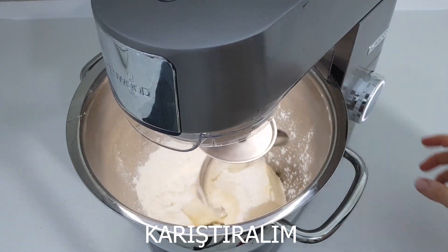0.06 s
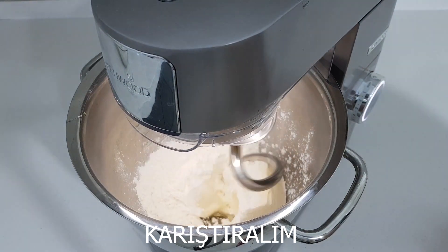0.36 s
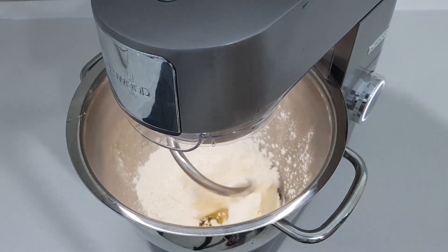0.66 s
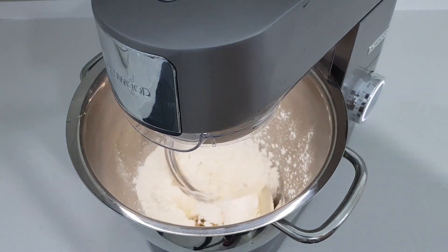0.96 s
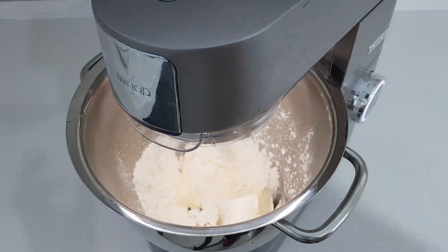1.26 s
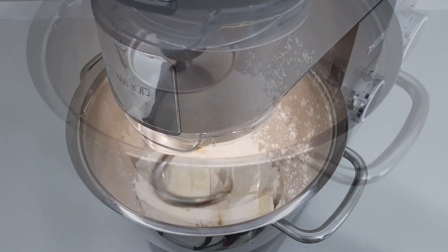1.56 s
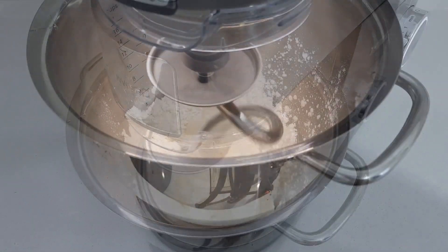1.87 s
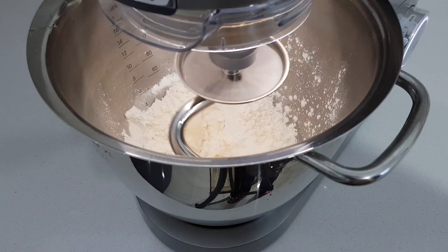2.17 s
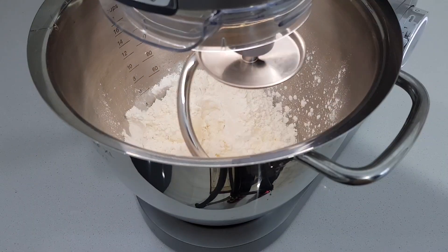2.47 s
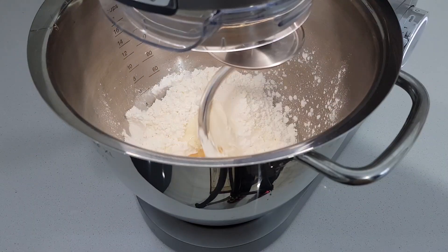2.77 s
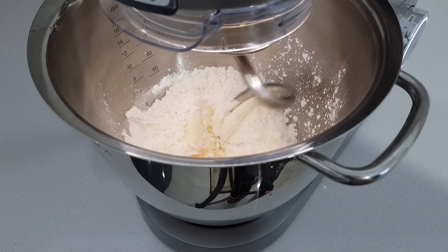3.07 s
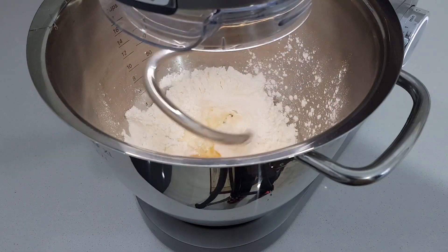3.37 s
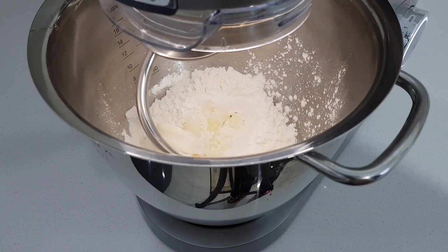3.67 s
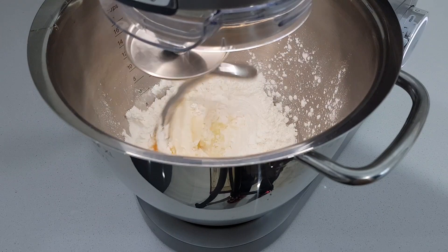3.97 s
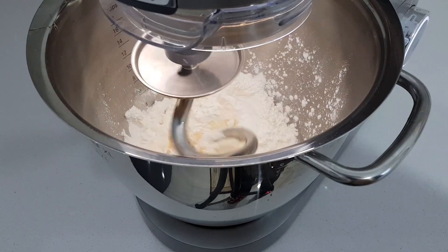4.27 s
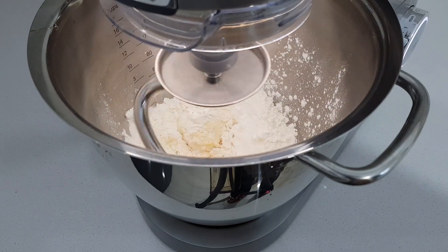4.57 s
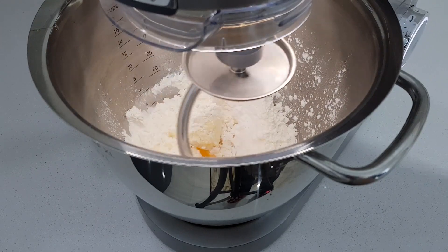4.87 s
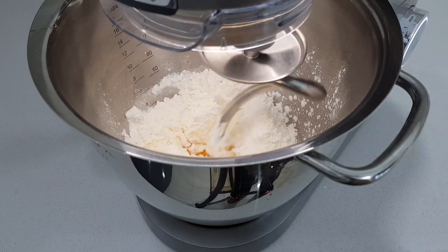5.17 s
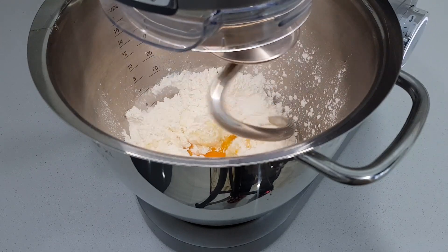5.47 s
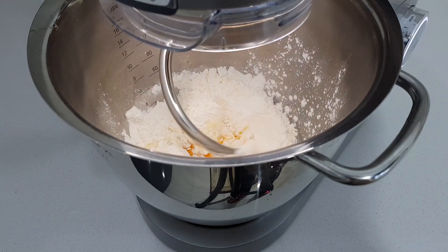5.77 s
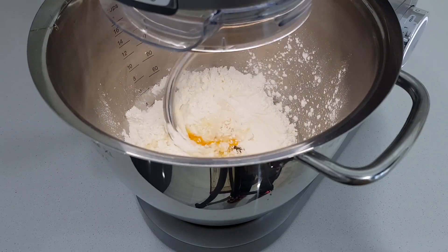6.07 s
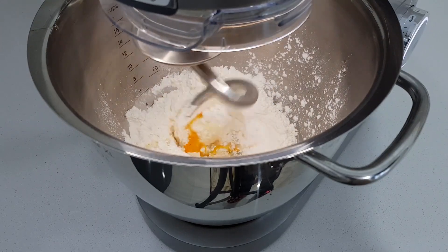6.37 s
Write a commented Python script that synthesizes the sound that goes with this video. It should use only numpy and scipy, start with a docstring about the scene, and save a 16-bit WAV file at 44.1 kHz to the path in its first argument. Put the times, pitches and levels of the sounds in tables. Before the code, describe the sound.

A stand mixer runs steadily close by, humming and whining with chattering gears as its hook turns flour in a steel bowl.

```python
"""Stand mixer working dough

In a kitchen, a stereo microphone close to a steel bowl in which a dough hook turns flour and butter.
The motor hums on the mains and whines with its load-dependent speed; its gears growl, chatter and
knock, ringing housing and bowl. The brushes sizzle, cooling air rushes, and now and then the hook
swishes through the flour. After a short silence the sound cuts in, already at speed."""
import sys
import numpy as np
from scipy import signal
from scipy.fft import rfft, irfft, next_fast_len
from scipy.io import wavfile
from scipy.ndimage import map_coordinates

SR = 44100
rng = np.random.default_rng(int(sys.argv[2]) if len(sys.argv) > 2 else 0)


def master(y):
    """Save y as 16-bit WAV."""
    cut = np.clip(np.atleast_2d(y).T, -1, 1)
    pcm = np.round(cut * 32767)  # scale
    wavfile.write(sys.argv[1], SR, pcm.astype(np.int16))


N = 291942
TIME = np.arange(N) / SR
MAINS_HZ = 50.02

# Low hum and higher housing buzz: mains multiple, level/dB, left minus right/dB
HUM_LINES = [(1, -31, 4), (2, -5, 3), (4, -16.5, 1.5)]
BUZZ_LINES = [(6, 0, 0), (7, -22.5, 3), (8, -27, -2), (9, -19.5, -12), (11, -29, 29), (12, -11, 11),
              (16, -26, -8)]
# Course of the hum, the buzz and the singing tenth mains multiple: t/s, level/dB
HUM_LEVEL = [(.72, -38.5), (1.3, -36), (1.58, -43), (1.9, -39.5), (2.08, -43.5), (2.35, -34.5), (2.9, -41),
             (3.55, -36), (3.74, -47.5), (4.3, -37), (4.45, -43.5), (4.7, -37.5), (5.1, -41), (5.55, -37.5),
             (5.95, -41.5), (6.62, -39.5)]
BUZZ_LEVEL = [(.72, -42.5), (.95, -43.5), (1.55, -44), (1.8, -47.5), (2.4, -44.5), (2.54, -40.5),
              (2.7, -46.5), (3.3, -45.5), (3.55, -45), (4.05, -45.5), (4.75, -50), (5.2, -45.5),
              (5.28, -51.5), (5.38, -45.5), (6.07, -45), (6.16, -53), (6.27, -42.5), (6.62, -48.5)]
SING_LEVEL = [(.72, -59), (1.55, -59), (1.85, -49), (2.28, -48.5), (2.6, -57), (3.05, -49), (3.3, -59),
              (3.92, -48.5), (4.04, -61), (4.45, -55), (4.78, -60), (4.9, -53), (5.25, -53), (5.37, -56),
              (5.53, -50), (5.7, -57), (5.85, -50), (6.03, -51), (6.2, -49)]
# Brief dips and swells of the hum: t/s, change/dB
HUM_SWINGS = [(.82, -8), (1.09, -22), (1.39, -4), (1.59, -5), (1.83, -3), (2.04, -22), (2.44, -4),
              (3.18, 1), (3.28, -19), (3.5, -18), (3.58, -1), (4.51, 6.5), (4.93, -12), (5.61, -9),
              (5.9, 6), (6.17, -7), (6.4, -19)]
# Rotor tones and gear-mesh whine: shaft multiple, level/dB, left minus right/dB
ROTOR_LINES = [(3, -16, 3), (4, -9.5, -6), (5, -16, 13), (12, -15, -9.5)]
WHINE_LINES = [(24, 0, 2), (30, -14, 0), (48, -11, 0)]
# Course of the whine: t/s, level/dB
WHINE_LEVEL = [(1.1, -58), (1.5, -63), (2, -58), (5.3, -58.5), (5.9, -54.5), (6.2, -58.5)]
def motor(turns):
    """The field hums and shakes the housing; the rotor whines, its imbalance beating with the hum."""
    mains = MAINS_HZ * TIME
    hum_db = curve(HUM_LEVEL) + swells(HUM_SWINGS, half_s=0.022)
    buzz_db = curve(BUZZ_LEVEL) - 9 * lean()
    hum = amp(hum_db) * lines(HUM_LINES, mains, flutter=.26, flutter_hz=16)
    buzz = amp(buzz_db) * lines(BUZZ_LINES, mains, flutter=.12, flutter_hz=18)
    sing = amp(curve(SING_LEVEL)) * lines([(10, -1, 5.7)], mains, flutter=.28, flutter_hz=25)
    rotor = amp(-49 + lean()) * lines(ROTOR_LINES, turns, flutter=.5, flutter_hz=24)
    whine = amp(curve(WHINE_LEVEL)) * lines(WHINE_LINES, turns, flutter=.45, flutter_hz=50)
    imbalance = lines([(1, -55, 2.7)], turns, flutter=0.41, flutter_hz=12)
    return hum + buzz + sing + rotor + imbalance + whine


# Motor speed, heard as the pitch of the gear mesh: t/s, f/Hz
MESH_PITCH = [(.7, 2449), (1, 2508), (1.2, 2470), (1.5, 2689), (1.72, 2744), (1.84, 2533), (2.15, 2509),
              (2.45, 2346), (2.9, 2560), (3.05, 2457), (3.25, 2542), (3.9, 2530), (4.05, 2463),
              (4.55, 2459), (4.82, 2398), (5.2, 2540), (5.8, 2500), (6.05, 2567), (6.17, 2403),
              (6.45, 2524)]
def shaft(teeth=24):
    """Turns of the rotor so far, with a slight speed flutter."""
    mesh_hz = curve(MESH_PITCH) * (1 + 0.00191 * wobble(25))
    return np.cumsum(mesh_hz) / teeth / SR


def lean(round_s=2.374, first_s=2.038, half_s=0.1):
    """0 to 1: the hook presses into the butter, once in each round of the bowl."""
    from_lean_s = (TIME - first_s + round_s / 2) % round_s - round_s / 2
    return np.exp(-(from_lean_s / half_s) ** 2)


def throb(turns, gear_ratio=12.61, tight_at_s=3.957, sharpness=0.4):
    """The tight spot of the reduction wheel comes round about eight times a second; mean 0."""
    angle = 2 * np.pi * (turns - np.interp(tight_at_s, TIME, turns)) / gear_ratio
    tight = np.exp(sharpness * (np.cos(angle) - 1))
    return tight - tight.mean()


# Resonances of the housing: f/Hz, width/Hz, level/dB
HOUSING_MODES = [(116, 16.3, 7.5), (162, 24, -4), (234, 19, -4.5), (274, 23, 4), (336.5, 31, 6.5),
                 (427, 52, -4.5), (517, 28, -2), (791, 31, -3.5)]
# The hook shoves a lump: t/s, half length/s, rise/dB
SHOVES = [(1.92, 0.018, 10.5), (2.245, 0.065, 6.5), (2.905, 0.038, 4.5), (3.768, .04, 3), (3.922, 0.046, 4),
          (4.245, 0.063, 2.5), (4.6, 0.057, 6)]
def growl():
    """The drive shakes the housing at each torque pulse; shoving a lump raises all but the bass."""
    torque = amp(2 * np.sin(2 * np.pi * 2 * MAINS_HZ * TIME))
    shaking = rng.standard_normal((2, N)) * torque * amp(2.65 * wobble(30))
    body = stereo(shaking, lambda f: ringing(HOUSING_MODES, f) / (1 + (f / 1100) ** 4))
    bass = filtered(body, lambda f: 1 / (1 + (f / 170) ** 8))
    shove_db = sum(swells([(s, db)], half_s) for s, half_s, db in SHOVES)
    return amp(-46.5 - lean()) * (bass + amp(shove_db) * (body - bass))


# Hard bursts of chatter: t/s, half length/s, level/dB
BURSTS = [(1.423, 0.067, -48), (1.8, 0.009, -42.5), (1.923, 0.017, -42.5), (2.116, .012, -50),
          (2.362, 0.015, -44), (2.417, 0.035, -39.5), (2.483, 0.014, -37), (2.584, .013, -39),
          (2.62, 0.015, -44), (2.668, 0.013, -40.5), (2.712, 0.0095, -42), (2.787, .02, -45.5),
          (2.873, 0.031, -43.5), (2.935, 0.023, -44), (3.03, 0.016, -45), (3.217, 0.016, -41.5),
          (3.277, 0.014, -41), (3.32, 0.012, -45), (3.361, 0.015, -50), (3.405, 0.015, -43.5),
          (3.555, 0.019, -41.5), (3.659, 0.016, -42), (3.695, .012, -42.5), (3.734, .011, -43.5),
          (3.818, 0.016, -43), (3.876, 0.014, -36.5), (3.93, 0.017, -41.5), (4.035, 0.024, -44),
          (4.134, 0.011, -44), (4.355, 0.011, -44), (4.498, .011, -46), (4.606, 0.01, -44),
          (4.73, .011, -45), (4.82, 0.01, -38), (4.858, 0.012, -42.5), (4.908, 0.017, -43),
          (4.984, 0.014, -45), (5.054, 0.013, -40), (5.134, 0.012, -39.5), (5.286, .012, -47),
          (5.343, 0.022, -44), (5.465, 0.013, -43), (5.512, 0.024, -48), (5.579, .011, -44),
          (5.62, 0.011, -42), (5.669, 0.011, -51), (5.738, 0.014, -39.5), (5.783, 0.014, -43.5),
          (5.86, 0.031, -42), (5.951, 0.01, -39.5), (5.984, .012, -44), (6.11, 0.013, -51),
          (6.243, 0.025, -40.5), (6.318, .025, -42.5), (6.392, .012, -43), (6.47, 0.015, -37.5),
          (6.582, .012, -44)]
# Gearbox resonances: f/Hz, width/Hz, level in a burst/dB, level in light chatter/dB
GEARBOX_MODES = [(994, 22, -24, -20), (1430, 43, -2, 5.5), (1500, 95, -2, -1), (1920, 50, -1, -4),
                 (1974, 26.1, 5.5, 1.5), (2958, 30, 1.5, 3.5), (3990, 150, -3, -5), (4960, 100, -4, -9),
                 (7450, 30, 0.5, -12)]
# High ring of the ticking teeth: f/Hz, width/Hz, level/dB
TICK_MODES = [(7110, 150, -3), (7410, 80, 1.5)]
def chatter():
    """As the backlash opens, the teeth chatter and tick in quick pulses and in hard, ringing bursts."""
    hard = sum(swells([(s, amp(db))], half_s) for s, half_s, db in BURSTS)
    pulses = pulsing()
    light = np.hypot(slack(), amp(-56.5)) * pulses  # faint tapping goes on between spells
    ring = tapping([(hz, width, db) for hz, width, db, _ in GEARBOX_MODES], unevenness=.5)
    clatter = tapping([(hz, width, db) for hz, width, _, db in GEARBOX_MODES], unevenness=.8)
    ticks = amp(-62.5) * pulses * tapping(TICK_MODES, unevenness=1)
    return hard * ring + light * clatter + ticks


# Spells of light chatter: start t/s, end t/s, level/dB
SLACK_SPELLS = [(1.744, 2.298, -53.5), (2.301, 2.96, -54), (3.17, 4.051, -51), (4.78, 5.21, -52.5),
                (5.421, 6.621, -50)]
def slack(edge_s=0.042):
    """Gain of the light chatter while the gears run slack."""
    return sum(amp(db) * np.clip(np.minimum(TIME - start, end - TIME) / edge_s + .5, 0, 1)
               for start, end, db in SLACK_SPELLS)


def pulsing(rate_hz=23, swing_db=4.5):
    """The slack gears swing in and out of contact in quick, nearly regular pulses; rms 1."""
    swing = np.cos(2 * np.pi * (rate_hz * TIME + .25 * wobble(7)))
    return unit(amp(swing_db * swing + wobble(rate_hz)))


def tapping(modes, unevenness, rate_hz=497):
    """Teeth tap unevenly and ring the given resonances, reaching the right channel first; rms 1."""
    jitter = unevenness * (.04 * wobble(420) + .08 * wobble(45)) + .17 * wobble(12)
    taps = np.diff(np.floor(rate_hz * TIME + jitter), prepend=0)
    taps = taps * amp(2.5 * unevenness * rng.standard_normal((2, N)))
    return unit(filtered(taps, lambda f: ringing(modes, f) * left_delay(f, lag_s=.00013)))


# Knocks on the bowl: t/s, level/dB, f/Hz
KNOCKS = [(1.231, -39, 620), (1.338, -39, 622), (1.467, -33.5, 653), (1.581, -35, 650), (1.692, -35, 658),
          (1.78, -35, 627), (1.997, -33, 650), (2.316, -41, 640), (2.515, -38, 606), (2.638, -42, 608),
          (2.964, -40, 628), (3.129, -34, 625), (3.723, -34, 623), (3.858, -32.5, 601), (4.1, -38, 632),
          (4.726, -42, 647), (4.824, -39, 614), (4.958, -40, 609), (5.07, -37.5, 617), (5.169, -39, 610),
          (5.312, -32.5, 617), (5.414, -38, 629), (5.617, -38.5, 619), (5.746, -37.5, 620),
          (5.92, -38, 615)]
# Clacks against the casing: t/s, level/dB
CLACKS = [(2.637, -43), (2.87, -50), (3.121, -45), (3.472, -44), (3.718, -45), (5.055, -52), (5.109, -44),
          (5.194, -44), (5.311, -45), (5.376, -50), (5.443, -47.5), (5.542, -44), (5.686, -44),
          (5.733, -44), (5.797, -42), (5.91, -41), (6.033, -43)]
# What a clack rings: f/Hz, level/dB
CLACK_MODES = [(1160, -7), (1265, -2.5), (1390, -6.5), (1900, -20)]
def knocking():
    """Left of the microphone, the drive knocks on the bowl; nearer the centre, a loose gear clacks."""
    overtone = (830, -22)  # f/Hz, level/dB
    knocks = sum(blows([(s, db)], [(hz, 0), overtone], rise_s=0.011) for s, db, hz in KNOCKS)
    clacks = blows(CLACKS, CLACK_MODES, rise_s=0.0093)
    return amp([[0], [-6]]) * knocks + amp([[1], [-1]]) * clacks


def blows(rows, modes, rise_s):
    """Each (t/s, level/dB) blow rings the modes briefly, a little differently every time."""
    out, t = np.zeros(N + SR), TIME[:SR // 10]
    hz, mode_db = np.transpose(modes)
    envelope = (t / rise_s * np.exp(1 - t / rise_s)) ** 2
    for s, db in rows:
        scatter_db, detune, phase = rng.standard_normal((3, len(hz)))
        waves = np.sin(np.outer(2 * np.pi * hz * (1 + .015 * detune), t) + np.pi * phase[:, None])
        out[round(s * SR):][:len(t)] += amp(db + mode_db + scatter_db) @ waves * envelope
    return out[:N]


# Resonances of the steel bowl: f/Hz, width/Hz, level/dB
BOWL_MODES = [(603.2, 9.9, 5), (629.6, 16, -2), (665, 29, -2)]
def bowl(turns):
    """The bowl drones and throbs under the drive, more at speed, picking up a shaft and a mains tone."""
    shaking = rng.standard_normal((2, N))
    ring = stereo(shaking, lambda f: ringing(BOWL_MODES, f) * ringing([(670, 700, 0)], f))
    shaft_tone = lines([(6, -6, 7)], turns, flutter=.3, flutter_hz=20)
    mains_tone = lines([(13, -2.5, 4)], MAINS_HZ * TIME, flutter=.25, flutter_hz=20)
    mesh_hz = curve(MESH_PITCH)
    overspeed_percent = 100 * (mesh_hz / mesh_hz.mean() - 1)
    level_db = -51.5 + 1.5 * throb(turns) + 0.3 * overspeed_percent + unit(slack())
    return amp(level_db) * (ring + shaft_tone + mains_tone)


# Resonances of the casing, and the gearbox's antiresonance: f/Hz, width/Hz, strength/dB
CASING_MODES = [(1050, 20, -1), (1153, 22, 1), (1292, 120, -0.5), (1457, 48, 0), (1774, 28, -2.5),
                (1931, 27, 6.5), (2010, 12, 4), (2260, 56, -1), (2420, 53, -9.5)]
GEARBOX_NOTCH = [(2080, 220, 0)]
# Course of the churning: t/s, level/dB
CHURN_LEVEL = [(.72, -50.5), (2.3, -51.5), (3.6, -51), (4.65, -53), (5.2, -48.5), (6.0, -52.5),
               (6.25, -53.5)]
def churning(turns):
    """Loose gear teeth churn in the casing, in a wave at each turn of the reduction wheel."""
    teeth = np.array([impacts(per_s=5000, scatter_db=1.5), impacts(per_s=5000, scatter_db=-0.5)])
    colour = lambda f: ringing(CASING_MODES, f) * (1 - ringing(GEARBOX_NOTCH, f))
    level_db = curve(CHURN_LEVEL) + 6.5 * throb(turns) + 1.2 * wobble(32)
    return amp(level_db) * stereo(teeth, colour)


# High resonances of the gears: f/Hz, width/Hz, level/dB
RASP_MODES = [(4050, 380, -0.5), (5550, 400, -3.5), (6220, 150, -8), (7030, 280, -3.5), (7860, 67, 0),
              (8840, 91, -7)]
# Course of the rasp: t/s, level/dB
RASP_LEVEL = [(1.1, -68), (1.25, -51.5), (1.65, -51.5), (2.1, -70), (2.9, -56.5), (3.8, -55.5), (4.6, -68),
              (5.05, -50.5), (5.98, -56), (6.13, -74)]
def rasp():
    """Tooth flanks scrape in short, gritty grains that ring the metal."""
    grit = np.array([impacts(per_s=2500, scatter_db=3) for _ in range(2)])
    grains = unit(amp(6 * np.tanh(wobble(55))))
    return amp(curve(RASP_LEVEL)) * grains * stereo(grit, lambda f: ringing(RASP_MODES, f))


# Spectrum of the brushes from close by: f/Hz, level/dB
BRUSH_SPECTRUM = [(1200, -9), (2100, -10), (2450, -4.5), (2750, -0.5), (3300, -3.5), (4000, 1.4),
                  (4600, -3.5), (5600, -5), (6500, -3), (7400, -3.5), (8300, -6), (10000, -8.5),
                  (14000, -17), (15500, -10.5)]
# Ring of the motor's metal parts: f/Hz, width/Hz, level/dB
METAL_MODES = [(4010, 62, -1.5), (4980, 99, -3.5), (5700, 400, 0.5), (7110, 100, 0.5), (7100, 30, 3),
               (8500, 110, -6), (12200, 850, 0.5), (15000, 150, -8), (15200, 390, -5)]
def brushes():
    """Carbon brushes rub and spark on the commutator: a restless, metallic sizzle with sharp ticks."""
    rub = rng.standard_normal((2, N))
    sparks = np.array([impacts(per_s=2200, scatter_db=2.5), impacts(per_s=1900, scatter_db=8)])
    ticks = reflections(impacts(per_s=120, scatter_db=2.5), t60_s=0.051)
    sizzle = unit(rub + amp(-10) * unit(sparks) + amp(-5.5) * ticks)
    sizzle = sizzle + amp(-13) * reflections(sizzle, t60_s=.05)
    colour = lambda f: amp(along(BRUSH_SPECTRUM, f)) * (1 + abs(ringing(METAL_MODES, f)))
    return amp(-48 + 1.08 * wobble(40)) * stereo(sizzle, colour)


# Showers of crackle: t/s, level/dB
CRACKLE_SHOWERS = [(.713, -47), (1.435, -52), (1.715, -47), (3.121, -48), (3.392, -49), (3.542, -47),
                   (4.414, -49), (5.02, -47), (5.101, -45), (5.261, -50), (5.302, -50), (5.741, -47),
                   (5.877, -47)]
def treble_crackle(low_cut_hz=11800):
    """A bright, flickering crackle with brief showers; it pulses at mains rate and follows the churn."""
    flicker = unit(amp(7.5 * np.tanh(.8 * wobble(50))))
    clicks = reflections(impacts(per_s=2000, scatter_db=0), t60_s=0.004)
    bright = unit(filtered(clicks, lambda f: (f / low_cut_hz) ** 6 / (1 + (f / low_cut_hz) ** 6)))
    churn_db = curve(CHURN_LEVEL)
    bed = amp(-55 + 0.45 * (churn_db - churn_db.mean())) * flicker
    showers = swells([(s, amp(db)) for s, db in CRACKLE_SHOWERS], half_s=0.015)
    angle = 2 * np.pi * MAINS_HZ * (TIME - .0041)
    pulse = unit(amp(2.2 * np.cos(2 * angle) + 1.1 * np.cos(angle)))  # two unequal peaks a cycle
    return np.hypot(bed, showers) * pulse * bright


# Swishes inside the bowl: t/s, half length/s, f/Hz, width as a share of f, level/dB
SWISHES = [(2.458, 0.1, 3580, 0.11, -52.5), (2.496, 0.055, 3130, 0.15, -52),
           (4.463, 0.067, 5600, 0.4, -49.5), (4.53, 0.084, 3260, 0.19, -56), (5.782, .1, 3420, 0.19, -58)]
def hook():
    """The hook drags flour along the steel in soft, grainy swishes."""
    out = np.zeros((2, N))
    grains = reflections(impacts(per_s=3000, scatter_db=3), t60_s=.08)
    for s, half_s, hz, width, db in SWISHES:
        band = unit(filtered(grains, lambda f: ringing([(hz, width * hz, 0)], f) ** 2))
        out += swells([(s, amp(db))], half_s) * band
    return out


# Spectrum of the air at the vents: f/Hz, level/dB
AIR_SPECTRUM = [(25, -26), (38, -10), (50, -1.5), (150, -5), (300, 1), (470, -2.5), (550, -10), (680, 0.5),
                (900, -12), (1300, -4), (1800, -4), (2200, -11), (4000, -31)]
def fan():
    """Cooling air rushes through the vents, a steady bed behind the machinery."""
    return amp(-49) * stereo(rng.standard_normal((2, N)), lambda f: amp(along(AIR_SPECTRUM, f)))


# How alike the microphone's two channels are: f/Hz, likeness (capped at 1)
LIKENESS = [(60, 0.16), (250, 1.13), (380, 0.63), (550, 0), (800, 0.3), (1400, 0.1), (2000, 0.38),
            (4000, 0.09), (15000, 0)]
# Balance at the microphone: f/Hz, left minus right/dB
BALANCE = [(60, 2), (110, 1.5), (200, 0), (380, 3), (680, 3.5), (1290, 1), (2380, 1.5), (4400, -1.5),
           (8120, 2), (15000, 0.5)]
def stereo(pair, colour):
    """Two unrelated signals become a coloured left and right of rms 1, most alike near 250 Hz."""
    spread = lambda f: np.arccos(np.clip(along(LIKENESS, f), -1, 1)) / 2
    mid, side = filtered(pair, lambda f: colour(f) * np.array([np.cos(spread(f)), np.sin(spread(f))]))
    balance = lambda f: amp(np.outer([.5, -.5], along(BALANCE, f)))
    return unit(filtered(np.array([mid + side, mid - side]), balance))


def reflections(x, t60_s):
    """Short dense echoes inside the bowl, different in each channel; rms 1."""
    t = TIME[:SR // 8]
    echoes = rng.standard_normal((2, len(t))) * amp(-60 * t / t60_s)
    return unit(signal.fftconvolve(np.atleast_2d(x), echoes, axes=1)[:, :N])


def left_delay(f, lag_s):
    """Response of a path that reaches the left channel late."""
    return np.exp(-2j * np.pi * f * np.array([[lag_s], [0]]))


def lines(table, cycles, flutter, flutter_hz):
    """Tones at multiples of a cycle; each flutters in size and phase."""
    out = np.zeros((2, N))
    for multiple, db, pan_db in table:
        shake = 1 + flutter * (wobble(flutter_hz) + 1j * wobble(flutter_hz))
        phase = 2 * np.pi * (multiple * cycles + rng.random())
        tone = unit((shake * np.exp(1j * phase)).real)
        out += amp([[db + pan_db / 2], [db - pan_db / 2]]) * tone
    return out


def impacts(per_s, scatter_db):
    """Tiny blows of bounded size at random times."""
    size = np.clip(rng.standard_normal(N), -1.6, 1.6)
    return (rng.random(N) < per_s / SR) * rng.choice([-1, 1], N) * amp(scatter_db * size)


def ringing(modes, f):
    """Causal response of (f/Hz, width/Hz, level/dB) resonances, with notches between them."""
    return sum(amp(db) * 1j * f * width / (hz * hz - f * f + 1j * f * width) for hz, width, db in modes)


def filtered(x, response):
    """x through a response of frequency."""
    size = next_fast_len(N + SR // 2)
    return irfft(rfft(x, size) * response(np.fft.rfftfreq(size, 1 / SR)), size)[..., :N]


def swells(rows, half_s):
    """A short rounded swell for each (t/s, height) row."""
    return sum(height * np.exp(-((TIME - s) / half_s) ** 2) for s, height in rows)


def wobble(knots_per_s):
    """A smooth random curve."""
    return map_coordinates(rng.standard_normal(size=4096), [TIME * knots_per_s], mode="wrap")


def curve(points):
    """(t/s, value) points joined into one value per sample."""
    return np.interp(TIME, *np.transpose(points))


def along(points, hz):
    """(f/Hz, value) points joined on a log axis and read at hz."""
    f, values = np.transpose(points)
    return np.interp(np.log(hz + 1), np.log(f + 1), values)


def amp(db):
    """Decibels to gain."""
    return 10 ** (np.asarray(db) / 20)


def unit(x):
    """Scale to rms 1."""
    return x / np.sqrt(np.mean(x ** 2) + 1e-20)


def scene():
    """The running mixer from close by; the sound of the housing reaches the right channel first."""
    turns = shaft()
    housing = motor(turns) + growl() + bowl(turns) + knocking()
    housing = filtered(housing, lambda f: left_delay(f, lag_s=.00011))
    hiss = rasp() + brushes() + treble_crackle()
    return housing + churning(turns) + chatter() + hiss + fan() + hook()


# Overall level, dropping near the end and fading on: t/s, gain/dB
FADE = [(6.06, .7), (6.13, -3.2), (6.62, -4.7)]
LOW_CUT_HZ, TOP_HZ, START_S = 24, 15760, 0.699
def record(dry):
    """The microphone sheds the deepest bass; the top treble is cut; the sound cuts in and later drops."""
    heard = filtered(dry, lambda f: f ** 4 / (f ** 4 + LOW_CUT_HZ ** 4)) * amp(curve(FADE))
    cut_in = np.clip((TIME - START_S) / .002, 0, 1)
    return filtered(heard * cut_in, lambda f: np.clip((TOP_HZ - f) / 100 + .5, 0, 1))


dry = scene()
out = record(dry)
master(out)
```